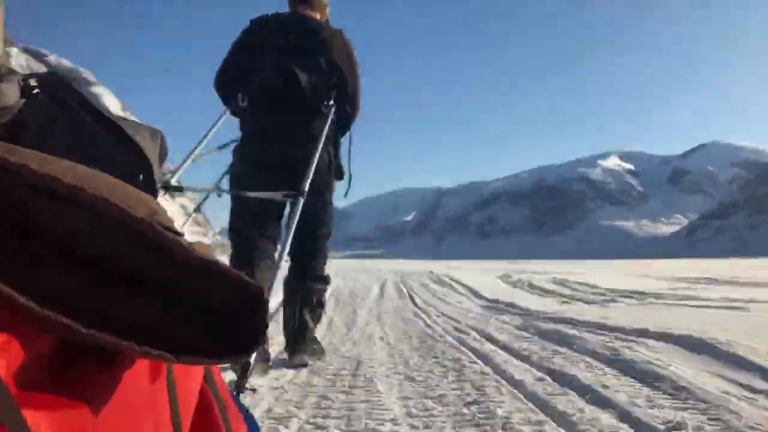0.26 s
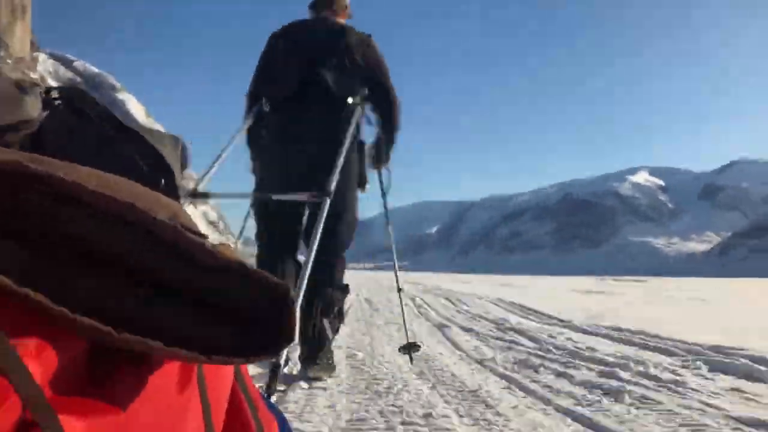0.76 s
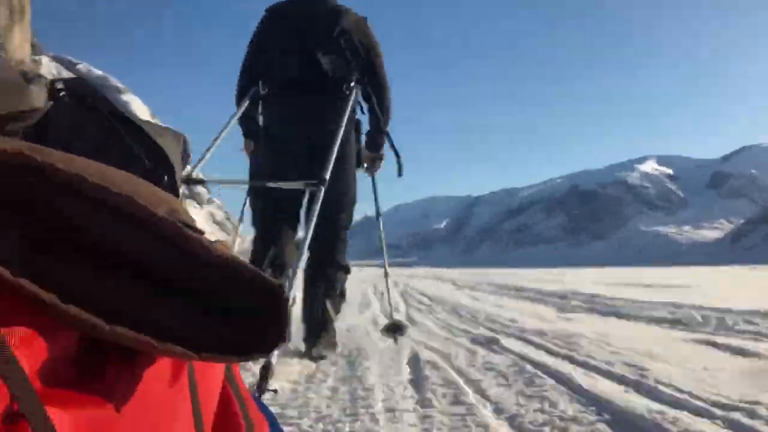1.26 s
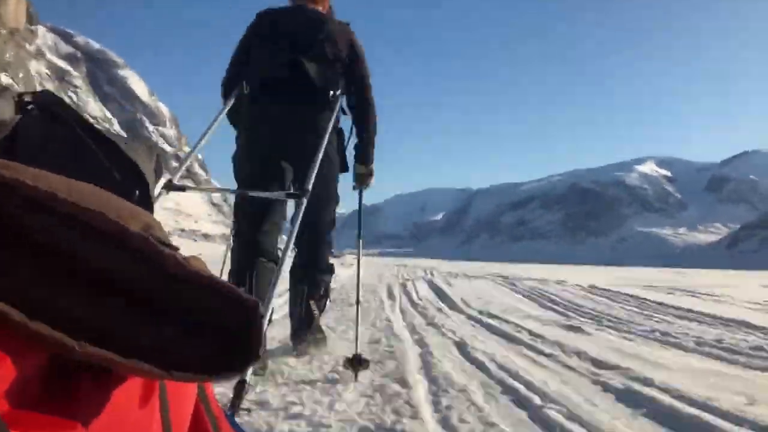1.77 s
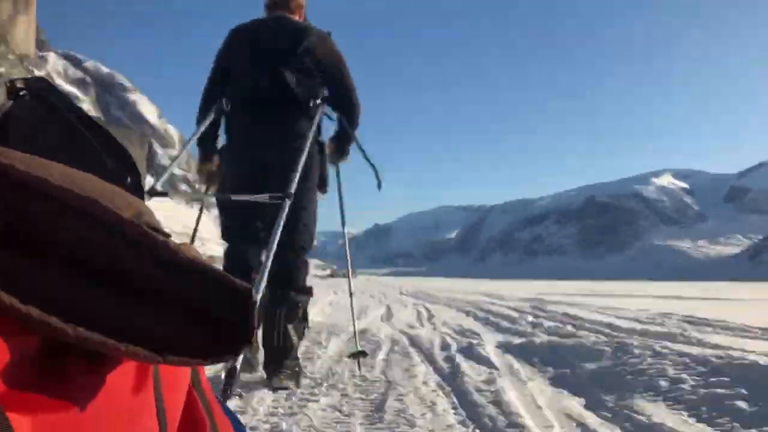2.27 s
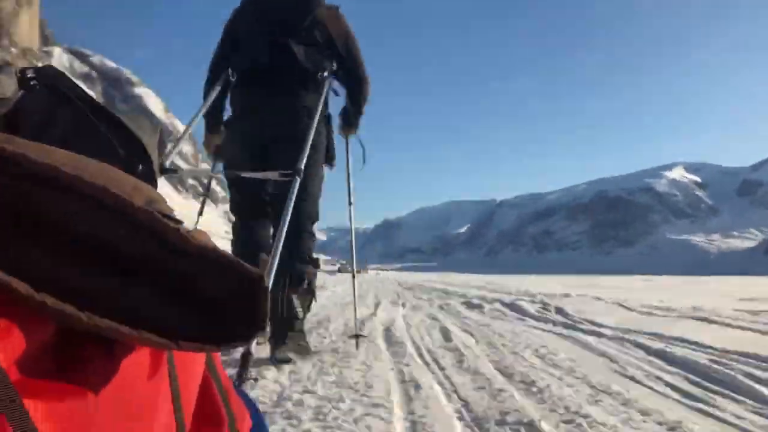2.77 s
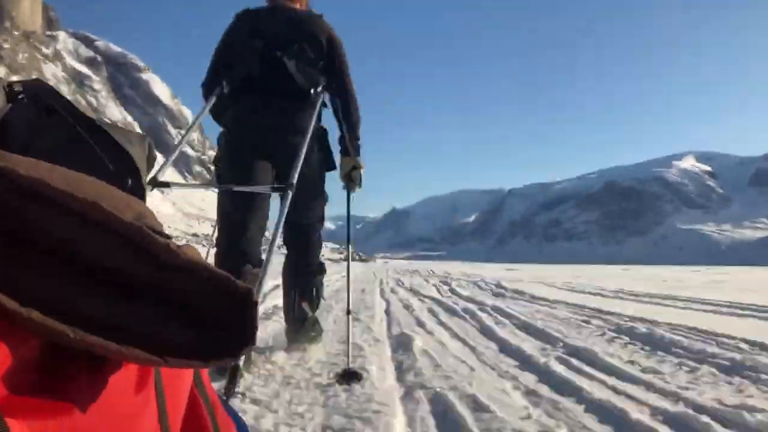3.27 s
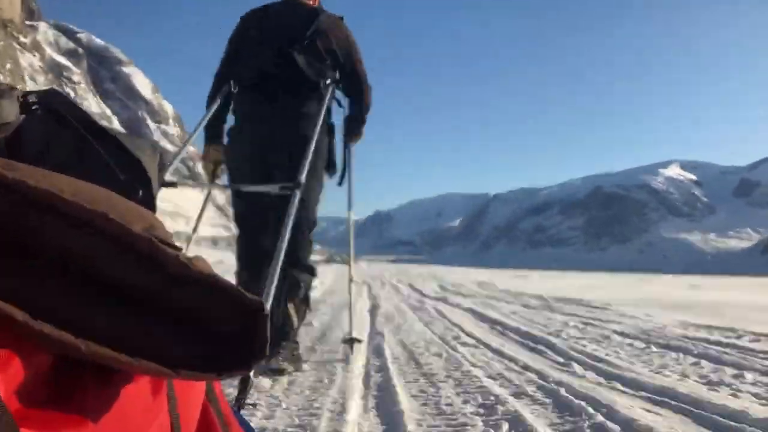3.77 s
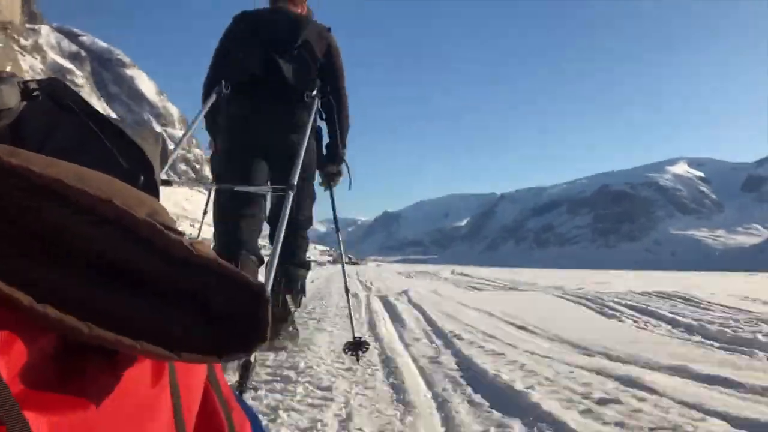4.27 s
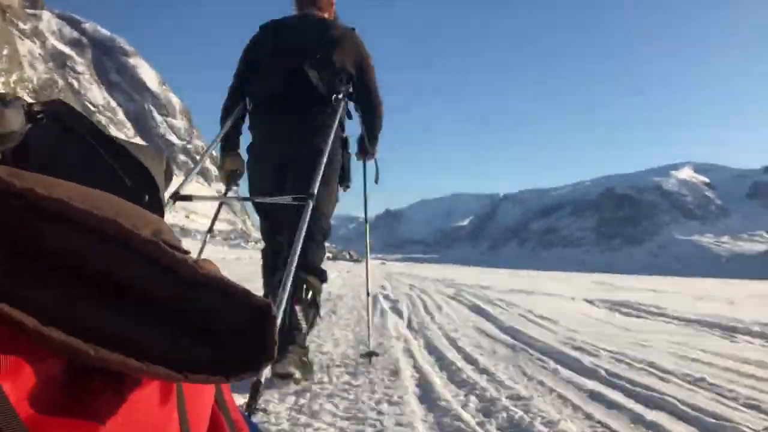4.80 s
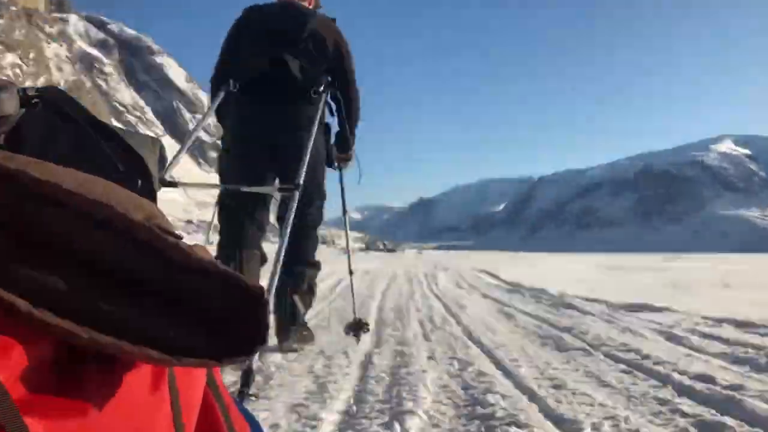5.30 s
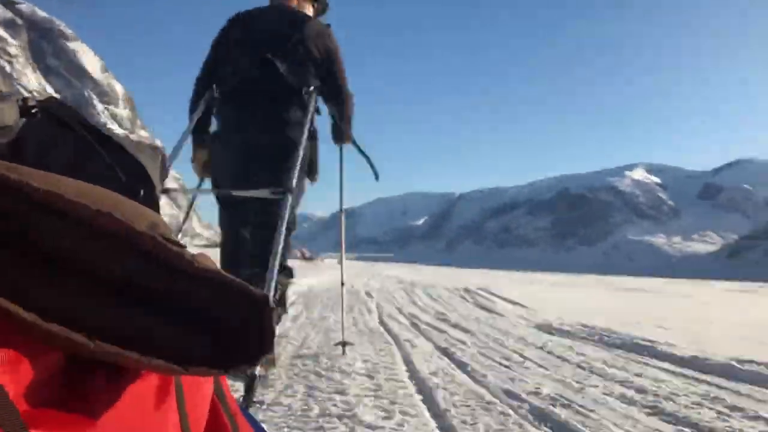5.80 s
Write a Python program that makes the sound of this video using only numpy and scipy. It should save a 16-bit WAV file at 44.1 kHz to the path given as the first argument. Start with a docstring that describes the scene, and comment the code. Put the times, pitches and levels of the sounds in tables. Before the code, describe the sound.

Outdoors on open snow, with no echo, a microphone on a loaded sled hears it being hauled. Throughout, the load booms very low in uneven jolts, leaning to the left-lower, right-stronger side, while runners scrape and hiss with a fast, ridged flutter. Boots crunch and faintly squeak ahead at about 0.4, 1.0, 1.7 and 2.4 s, then on to the end. Small pops burble underneath, with larger ones near 0.1-0.5 and 2.5-2.8 s. Dull knocks cluster around 0.7-1.1, 2.7-3.1 and 4.2-4.4 s, the hardest at 3.9 s beside sharp crust snaps. The drag eases near 2.1 s, and light wind puffs touch one side at 2.2-2.8 s. From 4.4 s a gust swells, buffeting and rushing until about 5.7 s, over a hoarse rasp near 5.3 s. The scrape grows and a big, long boom closes at 6 s.

```python
"""A loaded sled booms as it is hauled over ridged, packed snow, with a two-port microphone on the load.
The load is a low swinging tone; the runners hiss and flutter as filtered grains that follow the drag.
Lumps knock, pop and grind as decaying tones and noise; crust snaps and packed snow crunches.
Boots crunch and squeak through narrow resonances ahead.
Late on, a gust of shaped noise buffets and rushes; a few short puffs catch mostly one port."""
import sys
import numpy as np
from scipy import signal
from scipy.fft import rfft, irfft, next_fast_len
from scipy.io import wavfile

SR = 44100
rng = np.random.default_rng(int(sys.argv[2]) if len(sys.argv) > 2 else 0)


def persist_wave(psi):
    """Save psi, clipped to +-1, as 16-bit WAV."""
    counts = np.round(np.clip(psi, -1, 1) * 32767).astype(np.int16)
    wavfile.write(sys.argv[1], SR, np.atleast_2d(counts).T)


N = 266584
T = np.arange(N) / SR


def gain_of(db):
    """Decibels to gain."""
    return 10 ** (np.asarray(db) / 20)


def evened(x):
    """Scales to an rms of one."""
    return x / np.sqrt(np.mean(x ** 2) + 1e-20)


def in_time(rows):
    """The columns of a curve at every sample."""
    s, *columns = np.transpose(rows)
    return [np.interp(T, s, c) for c in columns]


def in_frequency(rows, hz):
    """The columns of a spectrum at the given frequencies, read along a log axis."""
    f, *columns = np.transpose(rows)
    return [np.interp(np.log(hz + 1), np.log(f + 1), c) for c in columns]


def add(mix, s, sound):
    """Adds a stereo sound into the mix at time s."""
    part = mix[:, max(round(s * SR), 0):][:, :sound.shape[1]]
    part += sound[:, :part.shape[1]]


def panned(sound, left_db):
    """Spreads a sound over the ports with a level difference, keeping their mean."""
    gains = gain_of([[left_db / 2], [-left_db / 2]])
    return sound * gains / gains.mean()


def wander(rate_hz):
    """Smooth chance of unit rms, changing up to about the given rate."""
    step = 32  # samples between drawn points
    size = next_fast_len(N // step + 2)
    hz = np.fft.rfftfreq(size, step / SR)
    slow = irfft(rfft(rng.standard_normal(size)) / (1 + (hz / rate_hz) ** 4), size)
    return np.interp(T, np.arange(size) * step / SR, evened(slow))


def resonate(x, hz, width_hz):
    """A resonance of gain one that follows hz: shift down to zero, smooth, shift back."""
    turn = np.exp(2j * np.pi * np.cumsum(hz * np.ones(x.shape[-1])) / SR)
    r = np.exp(-np.pi * width_hz / SR)
    return 2 * (turn * signal.lfilter([1 - r], [1, -r], x / turn)).real


def grains(per_s, spread_db, share):
    """Countless tiny fractures, plus sparse ones of uneven size that hold a share of the power."""
    size = gain_of(spread_db * np.minimum(rng.exponential(1, N), 4)) * (rng.random(N) < per_s / SR)
    sparse = evened(size * rng.choice([-1, 1], (2, N)))
    return np.sqrt(share) * sparse + np.sqrt(1 - share) * rng.standard_normal((2, N))


def heard(drive, spectrum, ports):
    """Colours two drives and blends them into the two ports; the mean of the ports has unit level."""
    size = next_fast_len(N + 4096)
    hz = np.fft.rfftfreq(size, 1 / SR)
    a, b = rfft(drive, size)
    same, left_db, lead = in_frequency(ports, hz)
    blend = same * a + np.sqrt(1 - same ** 2) * b
    left = blend * gain_of(left_db) * np.exp(1j * lead)
    colour = gain_of(in_frequency(spectrum, hz)[0]) / (1 + gain_of(left_db))
    out = irfft(np.array([left, a]) * colour, size)[:, :N]
    return out / out.mean(0).std()


def bell(t, rise_s, fade_s):
    """A smooth rise and fall around t = 0, each side with its own length."""
    return np.exp(-.5 * (t / np.where(t < 0, rise_s, fade_s)) ** 2)


def swell(s, half_s):
    """A smooth rise and fall around time s."""
    shape = np.zeros(N)
    near = slice(*np.searchsorted(T, [s - 6 * half_s, s + 6 * half_s]))
    shape[near] = bell(T[near] - s, half_s, half_s)
    return shape


def swells(rows):
    """The joint gain of swells given as (s, level dB, half length s)."""
    return np.sqrt(sum((gain_of(db) * swell(s, half)) ** 2 for s, db, half in rows))


# bumps that jolt the load: widest_s, peak_db, half_length_s, pitch_hz
JOLTS = [(0.423, -11.5, 0.037, 37.2), (0.555, -10, 0.015, 48.2), (0.633, -7.5, 0.014, 35.1),
         (0.793, -16.5, 0.026, 47.1), (.961, -10.5, 0.056, 39.5), (1.092, -8, 0.016, 46.9),
         (1.172, -14, 0.019, 53.4), (1.44, -16, 0.017, 36.4), (1.681, -14.5, 0.08, 36),
         (1.877, -7, 0.014, 40.9), (2.001, -17.5, 0.062, 35.8), (2.176, -10.5, 0.032, 38.4),
         (2.314, -9.5, 0.016, 36.4), (2.356, -8.5, 0.02, 35.9), (2.479, -12.5, 0.0096, 48.5),
         (2.881, -18.5, 0.022, 45.1), (2.98, -8, 0.014, 39.1), (3.055, -11.5, 0.012, 38.7),
         (3.128, -12, 0.0084, 45), (3.211, -15, 0.045, 44.5), (3.476, -7.5, 0.018, 40.3),
         (3.572, -14, 0.034, 39.4), (3.622, -10, 0.015, 34.2), (3.707, -11.5, 0.019, 33.6),
         (3.992, -7, 0.012, 42), (4.197, -8.5, 0.029, 37.5), (4.233, -6, 0.013, 43),
         (4.302, -9, 0.014, 39.3), (4.359, -10.5, 0.0092, 43.7), (4.45, -10, 0.04, 36.3),
         (4.784, -10.5, 0.086, 34.7), (5.054, -16, 0.032, 36.7), (5.273, -12, 0.013, 41.6),
         (5.41, -9.5, 0.012, 35.6), (5.458, -15.5, 0.053, 32.1), (5.756, -12, .017, 45.7),
         (5.944, -12.5, 0.014, 32.8), (5.994, -5.5, 0.066, 28.9)]
# colour of the load's rumble: freq_hz, relative_level_db
LOAD = [(8, -21), (20, -13), (28, -17.5), (50, 2.5), (62, -3.5), (80, -16.5), (110, -24.5), (200, -64.5)]
# how the ports hear the hull: freq_hz, likeness (0-1), left_minus_right_db, left_lead_rad
HULL_PORTS = [(60, 1, -11, 0.056), (130, 1, -7, 0.041), (300, 0.89, -9, 0.11), (800, 0.94, -6, 0.51)]
SWAY_HZ, SWAY_DB = 37.4, -23.5  # the load between jolts
RUMBLE_DB = -6.5  # relative to the sway
LOPSIDED = 0.061  # the lashings are stiffer one way, so wide swings gain an octave


def load():
    """The load sways at its low resonance and swings wide at each jolt, over a looser rumble."""
    # the shifting load never swings quite evenly
    clock = np.cumsum(np.exp(0.093 * wander(rate_hz=33.8))) / SR
    swing = gain_of(SWAY_DB + 3 * wander(rate_hz=16)) * np.cos(2 * np.pi * SWAY_HZ * clock)
    power = np.full(N, gain_of(SWAY_DB) ** 2)
    for s, db, half, hz in JOLTS:
        near = abs(T - s) < 5 * half
        reach = gain_of(db) * bell(T[near] - s, half, 1.3 * half)
        swing[near] += reach * np.cos(2 * np.pi * hz * (clock[near] - np.interp(s, T, clock)))
        power[near] += reach ** 2
    octave = LOPSIDED * (2 * swing ** 2 - power)
    level = np.sqrt(power / 2)
    rumble = heard(rng.standard_normal((2, N)), LOAD, HULL_PORTS) * gain_of(RUMBLE_DB) * level
    return swing / level, panned(swing + octave, left_db=-6.5) + rumble


# colour of the scraping runners: freq_hz, relative_level_db
SCRAPE = [(300, -18), (600, -8), (900, -3.5), (1080, -2.5), (1300, -0.5), (1500, -4.5), (1800, -5),
          (2100, -7), (2450, -8), (2850, -14.5), (4500, -16.5), (9000, -46.5)]
# how the ports hear the snow: freq_hz, likeness (0-1), left_minus_right_db, left_lead_rad
SNOW_PORTS = [(583, 0.3, 7, 0.96), (830, 0.83, -4.5, -0.39), (970, 0.83, 3, 0.99), (1630, 0.93, 1, -0.55),
              (2440, 0.51, -1.5, 0.0078), (4070, 1, -3, -0.52), (6500, 0.86, -1, 1), (7600, 0.6, -1, 0.21)]


def hull_ring(hz, width_hz):
    """Scraping grains ring one resonance of the hull."""
    rubbing = grains(per_s=500, spread_db=-1.0, share=0.48) * gain_of(2.2 * wander(rate_hz=14))
    ring = resonate(resonate(rubbing, hz, width_hz), hz, width_hz)
    return heard(ring, SCRAPE, SNOW_PORTS)


# how hard the runners bear on the snow, before the tugs: time_s, drag_db
DRAG = [(0, -1.3), (.2, 0.14), (.62, 0.5), (.9, 0), (1.28, -1), (1.55, 0.2), (1.77, 0.4), (2.06, -3.5),
        (2.21, -3), (2.31, 0), (2.8, -0.5), (3.28, -1.5), (3.55, .5), (4.4, 0.68), (5.3, -2.5),
        (5.62, -0.4), (5.86, -0.1), (6.03, 4)]
# rasps of hard crust that ring the hull: peak_s, hoarse_upper_ring_db, hollow_lower_ring_db, half_length_s
RASPS = [(0.162, -45, -52, 0.033), (0.435, -45.5, -56, 0.033), (0.62, -50, -46, 0.016),
         (1.012, -42.5, -42, 0.021), (1.732, -44.5, -48, 0.16), (3.607, -46, -52, 0.055),
         (3.797, -69, -50, 0.03), (4.186, -42.5, -41, 0.032), (5.314, -40.5, -45.5, 0.21),
         (5.525, -39.5, -62, 0.028), (5.74, -63, -47, 0.029)]
# patches of lumpy snow that grind under the hull: peak_s, level_db, half_length_s
CLODS = [(.18, -37.5, 0.072), (.48, -36, 0.11), (.84, -46, 0.072), (1.11, -36.5, 0.071),
         (1.54, -39.5, 0.19), (1.76, -31.5, 0.026), (1.91, -34.5, 0.062), (2.28, -38.5, 0.18),
         (2.79, -37.5, 0.037), (3.01, -35, 0.057), (3.92, -38, 0.029), (4.11, -35.5, 0.018),
         (5.49, -31.5, 0.034)]
# colour of the hissing runners: freq_hz, relative_level_db
HISS = [(1200, -5.5), (2300, -2), (2900, -3), (3500, -1), (4600, -5), (5900, -1), (6500, -3), (7000, -8),
        (8200, -10), (9600, -15.5)]
# colour of the grinding lumps: freq_hz, relative_level_db
GRIND = [(40, -18), (95, 4.5), (150, -1), (230, -2.5), (400, -7.5), (600, -12.5), (850, -14), (1200, -35.5),
         (3000, -55)]
SCRAPE_DB, HISS_DB, GRIND_DB = -44.5, -45, -40  # at a drag of 0 dB
SCRAPE_FOLLOWS, HISS_FOLLOWS, GRIND_FOLLOWS = 1, 2.27, 1  # dB per dB of drag
HOARSE_DB, HOLLOW_DB = -5.5, -11.5  # the hull's two rings, relative to the scrape
TUG_LEAD_S, TUG_HALF_S = 0.027, 0.055  # the harness pulls just before each boot takes the weight
RIDGES_PER_S, FLUTTER_DB = 18, 0.58
SKIM_FLUTTER, SKIM_BELOW_DB = 0.54, 0  # flutter gained per dB of drag below the skimming point


def runners(sway):
    """Snow crystals break under the runners as the drag and tugs vary; running light, they flutter more."""
    tugs_db = sum(tug_db * swell(s - TUG_LEAD_S, TUG_HALF_S) for s, *_, tug_db in STEPS)
    drag_db = in_time(DRAG)[0] + tugs_db
    flutter_db = FLUTTER_DB + SKIM_FLUTTER * np.maximum(SKIM_BELOW_DB - drag_db, 0)
    turns = np.cumsum(RIDGES_PER_S * (1 + 0.12 * wander(rate_hz=9.4))) / SR
    crest = evened(np.cos(2 * np.pi * turns) + 0.21 * np.cos(4 * np.pi * turns))
    height = 1 + 1.08 * wander(rate_hz=28)  # no two ridges are alike
    pressure_db = flutter_db * crest * height + .5 * wander(rate_hz=19.0) + 0.077 * sway

    coarse = grains(per_s=420, spread_db=2.2, share=.4)
    rubbing = coarse * gain_of(0.5 * pressure_db + 1.6 * wander(rate_hz=23))
    scraping = gain_of(SCRAPE_DB + SCRAPE_FOLLOWS * drag_db)
    hoarse = np.hypot(scraping * gain_of(HOARSE_DB), swells((s, db, half) for s, db, _, half in RASPS))
    hollow = np.hypot(scraping * gain_of(HOLLOW_DB), swells((s, db, half) for s, _, db, half in RASPS))
    scrape = heard(rubbing, SCRAPE, SNOW_PORTS) * scraping
    scrape += hull_ring(hz=1668, width_hz=460) * hoarse
    scrape += hull_ring(hz=846, width_hz=320) * hollow

    fine = grains(per_s=700, spread_db=2.2, share=.3)
    hiss = heard(fine * gain_of(pressure_db), HISS, SNOW_PORTS)
    hissing = gain_of(HISS_DB + HISS_FOLLOWS * drag_db)

    lumps = grains(per_s=260, spread_db=1.5, share=.5)
    grind = heard(lumps * gain_of(.5 * pressure_db + 1.0 * wander(rate_hz=47)), GRIND, HULL_PORTS)
    grinding = np.hypot(gain_of(GRIND_DB + GRIND_FOLLOWS * drag_db), swells(CLODS))
    return scrape + hiss * hissing + grind * grinding


# lumps that strike the hull: start_s, peak_db, pitch_hz
KNOCKS = [(0.704, -21.5, 180), (0.853, -23.5, 200), (1.065, -18, 186), (1.136, -22.5, 230),
          (1.848, -23, 140), (2.119, -21.5, 170), (2.452, -28, 198), (2.681, -20, 169), (2.765, -24.5, 190),
          (2.955, -27, 140), (3.036, -21, 297), (3.103, -25.5, 228), (3.652, -21, 254), (3.904, -14.5, 130),
          (4.192, -21, 247), (4.212, -19.5, 267), (4.278, -20.5, 242), (4.448, -23, 166)]
KNOCK_DROP, KNOCK_DROP_S = 0.95, 0.00078  # a knock starts this share above its pitch and sinks


def knocks():
    """A lump gives the loaded hull one dead blow, a sinking thud, and crumbles."""
    out, t = np.zeros((2, N)), np.arange(SR // 10) / SR
    for s, db, hz in KNOCKS:
        turns = np.cumsum(hz * (1 + KNOCK_DROP * np.exp(-t / KNOCK_DROP_S))) / SR
        thud = np.sin(2 * np.pi * turns) * np.exp(-t / 0.0048)
        crumble = resonate(rng.standard_normal(len(t)), 510, width_hz=390)
        crumble = evened(resonate(crumble, 510, width_hz=390))
        blow = thud + 0.36 * crumble * np.exp(-t / 0.0019)
        add(out, s, panned(blow / abs(blow).max() * gain_of(db), left_db=-7.5))
    return out


POP_HALF_S = 0.0025
POP_SINK_S = 0.01205  # the hull carries high notes faster than low ones, so each pop chirps downward


def pop(hz):
    """One lump bursts: a few rough cycles that sink in pitch."""
    t = np.arange(-SR // 100, SR // 100) / SR
    turns = np.cumsum(hz * np.exp(-t / POP_SINK_S)) / SR + rng.random()
    crumbs = evened(resonate(rng.standard_normal(len(t)), hz, hz))
    burst = np.sin(2 * np.pi * turns) + 0.34 * crumbs
    return panned(burst * bell(t, POP_HALF_S, POP_HALF_S), left_db=-6.5)


# large lumps that pop under the runners: loudest_s, tone_peak_db, pitch_hz (at the loudest)
POPS = [(.118, -39, 845), (.204, -33, 783), (.443, -29, 617), (.476, -32.5, 655), (.539, -37, 660),
        (2.458, -25.5, 527), (2.562, -32.5, 690), (2.66, -34, 650), (2.76, -31, 836), (2.807, -35, 780),
        (3.769, -35, 980), (3.831, -33.5, 990), (4.605, -33, 794)]
SMALL_POPS_PER_S = 45  # at random between the large ones
SMALL_POP_DB, SMALL_POP_HZ = -41, 680.6  # base level and pitch, varied for each pop


def pops():
    """Lumps burst under the runners: a few large ones, and many small ones that grow with the drag."""
    out, drag_db = np.zeros((2, N)), in_time(DRAG)[0]
    at = np.flatnonzero(rng.random(N) < SMALL_POPS_PER_S / SR)
    size_db = 2.6 * np.minimum(rng.exponential(1, N), 2)
    octaves = 0.453 * rng.uniform(-1.977, 2, N)
    level_db = SMALL_POP_DB + drag_db + size_db
    small = [(T[i], level_db[i], SMALL_POP_HZ * 2 ** octaves[i]) for i in at]
    for s, db, hz in POPS + small:
        sound = pop(hz)
        add(out, s - sound.shape[1] / 2 / SR, sound * gain_of(db))
    return out


def dull_crunch(crumbs, hz):
    """Breaking snow: one broad, dull band, leaning toward the right port."""
    band = crumbs[0] + 0.25 * crumbs[1] * np.array([[1], [-1]])
    for _ in range(3):
        band = resonate(band, hz, width_hz=540)
    return panned(evened(band), left_db=-6.5)


# snow giving way under the load: loudest_s, level_db, swell_s, fade_s, centre_hz
CRUNCHES = [(1.095, -40.5, 0.019, 0.0059, 480), (1.15, -41, 0.011, .018, 457),
            (1.71, -36.5, 0.016, 0.015, 510), (1.772, -33, 0.02, 0.012, 490),
            (3.01, -42.5, 0.033, 0.023, 448), (3.605, -38, 0.039, 0.021, 640),
            (4.205, -36.5, 0.024, 0.022, 480), (4.375, -35.5, .008, 0.0081, 546),
            (5.715, -38.5, 0.017, 0.017, 615)]


def crunches():
    """Packed snow gives way in a dense, dull crunch that builds and breaks off."""
    out, t = np.zeros((2, N)), np.arange(-SR // 8, SR // 8) / SR
    crumbs = grains(per_s=400, spread_db=2, share=.75)
    for k, (s, db, rise, fade, hz) in enumerate(CRUNCHES):
        body = dull_crunch(crumbs[:, k * len(t):(k + 1) * len(t)], hz)
        add(out, s + t[0], body * bell(t, rise, fade) * gain_of(db))
    return out


# bits of crust that snap or scuff: start_s, peak_db, pitch_hz, decay_s (of the crumbs)
SNAPS = [(1.067, -29, 1900, 0.0075), (1.351, -29, 1500, 0.0041), (1.846, -26, 800, 0.0036),
         (2.043, -36, 5000, 0.008), (2.229, -30.5, 880, 0.0041), (2.295, -26, 1300, 0.0058),
         (3.889, -25.5, 1150, 0.0036), (3.945, -28.5, 2600, 0.0049), (3.974, -25, 6200, 0.0018),
         (5.767, -28, 990, 0.0027)]


def snaps():
    """Crust cracks with one sharp click and a short spray of crumbs."""
    out, t = np.zeros((2, N)), np.arange(SR // 12) / SR
    for s, db, hz, decay in SNAPS:
        spray = rng.standard_normal(len(t)) * np.exp(-t / decay)
        spray[0] = 4  # the click
        width = min(1.24 * hz, 2800)
        crack = resonate(resonate(spray, hz, width), hz, width)
        add(out, s, panned(crack / abs(crack).max() * gain_of(db), left_db=2.0))
    return out


# boots twisting in the snow: loudest_s, level_db, squeak_hz, swell_s, fade_s,
# tug_db (change of drag on the sled; below zero it eases)
STEPS = [(0.357, -44, 4200, 0.061, 0.033, 0), (1.0, -44, 5220, 0.024, 0.1, 0),
         (1.671, -42, 3860, 0.051, 0.04, 1.5), (2.36, -49, 5000, 0.14, 0.046, 2),
         (2.895, -42.5, 4940, 0.053, 0.021, 1), (3.006, -44, 3830, 0.11, 0.03, 1.5),
         (3.6, -50, 4460, 0.15, 0.07, 1.5), (4.19, -43, 4070, 0.11, .022, 0.8),
         (4.789, -47.5, 4170, 0.041, 0.028, 1), (5.411, -48, 4000, 0.032, 0.032, 2.5),
         (5.77, -47, 3850, 0.088, 0.032, -2.5), (6.009, -51, 4500, 0.083, 0.037, -1.5)]


def boots():
    """Each boot packs cold snow: a stuttering, sinking crunch with a faint, wavering pair of squeaks."""
    out, t = np.zeros((2, N)), np.arange(-SR // 3, SR // 4) / SR
    grit = grains(per_s=400, spread_db=2.2, share=.6)
    crunch = grit * gain_of(2.5 * wander(rate_hz=29))
    waver = np.exp(0.0063 * wander(rate_hz=9.5))
    for k, (s, db, hz, rise, fade, _) in enumerate(STEPS):
        own = slice(k * SR // 3, k * SR // 3 + len(t))  # each step takes its own stretch of grit
        drive = crunch[0, own] + 0.091 * crunch[1, own] * np.array([[1], [-1]])
        pitch = hz * np.exp(-1.3 * t)
        body = evened(resonate(resonate(drive, pitch, width_hz=2200), pitch, width_hz=10000))
        pair = [resonate(body, pitch * waver[own] * ratio, width_hz=140) for ratio in (.88, 1.05)]
        step = evened(body + 0.53 * evened(sum(pair)))
        add(out, s + t[0], panned(step * bell(t, rise, fade) * gain_of(db), left_db=-5.0))
    return out


# soles that slip with a short gritty squeak: loudest_s, level_db, pitch_hz
SLIPS = [(.357, -44, 4300), (1.617, -39, 3700), (1.694, -37, 4020), (3.005, -43, 4000)]
SLIP_HALF_S, SLIP_WIDTH_HZ = 0.0055, 890


def slips():
    """A sole lets go for an instant and the snow beneath it squeaks."""
    out, t = np.zeros((2, N)), np.arange(-SR // 20, SR // 20) / SR
    for s, db, hz in SLIPS:
        grit = resonate(rng.standard_normal(len(t)), hz, SLIP_WIDTH_HZ)
        grit = evened(resonate(grit, hz, SLIP_WIDTH_HZ))
        squeak = grit * bell(t, SLIP_HALF_S, SLIP_HALF_S) * gain_of(db)
        add(out, s + t[0], panned(squeak, left_db=-9.5))
    return out


GUST_START_S, GUST_ATTACK_S, GUST_END_S, GUST_RELEASE_S = 4.363, 0.5, 5.6, 0.31


def wind_speed(lag_s):
    """The gust rises, holds and drops, 0 to 1; a lag delays both its start and its end."""
    rising = (T - lag_s - GUST_START_S) / GUST_ATTACK_S
    falling = (GUST_END_S + lag_s - T) / GUST_RELEASE_S
    return np.sin(np.pi / 2 * np.clip(np.minimum(rising, falling), 0, 1)) ** 2


# surges within the gust: peak_s, buffeting_db, half_length_s
SURGES = [(4.72, -30, 0.035), (4.865, -27.5, 0.071), (5.2, -26, 0.1), (5.36, -31, 0.052)]
# short puffs of wind that catch mostly one port: peak_s, gain_db, half_length_s, left_minus_right_db
PUFFS = [(2.206, -41.5, 0.023, -28), (2.288, -40.5, 0.038, -28), (2.774, -40, 0.04, -34),
         (5.26, -39.5, 0.068, 12)]
# colour of the buffeting: freq_hz, relative_level_db
BUFFET = [(20, -19.5), (70, -4), (130, -1), (220, -3.5), (350, -9), (550, -15.5), (900, -25), (1500, -34),
          (4000, -50)]
# colour of the rush of air: freq_hz, relative_level_db
RUSH = [(400, -2.5), (800, -3), (1200, -1), (1750, 1.5), (2100, -4), (2500, -2), (3100, -7.5), (4500, -6),
        (6200, -1), (6900, -8.5), (8500, -8.5), (9700, -12)]
# how the ports hear the wind: freq_hz, likeness (0-1), left_minus_right_db, left_lead_rad
WIND_PORTS = [(100, 0.1, -20, -1.5), (192, 0.12, -14, 1.5), (301, 0.15, -8, 3), (600, 0.18, 0, 0.5),
              (1070, 0.49, 6, 0.3), (2020, 1, 1, -0.6), (4500, 0.93, 0.5, -0.5), (6500, 0.66, 0.5, -0.5),
              (9000, 0.89, -1.5, 0.6)]
BUFFET_DB, RUSH_DB = -27.5, -35  # at full wind speed, without the surges
BUFFET_POWER, BUFFET_LAG_S = 2.6, 0.037  # buffeting grows faster with wind speed than the rush, and trails it


def gust():
    """Eddies hit the ports nearly on their own in the lows, in surges, under a rush of air."""
    eddies = heard(rng.standard_normal((2, N)) * gain_of(2.2 * wander(rate_hz=52)), BUFFET, WIND_PORTS)
    rush = heard(rng.standard_normal((2, N)) * gain_of(.5 * wander(rate_hz=31)), RUSH, WIND_PORTS)
    steady = gain_of(BUFFET_DB) * wind_speed(BUFFET_LAG_S) ** BUFFET_POWER
    buffeting = np.hypot(steady, swells(SURGES))
    rushing = gain_of(RUSH_DB) * wind_speed(0)
    stray = eddies[1, ::-1]  # backwards: like the eddies, but unrelated to them
    puffs = sum(panned(stray * swell(s, half) * gain_of(db), left_db) for s, db, half, left_db in PUFFS)
    return eddies * buffeting + rush * rushing + puffs


def scene():
    """Open snow throws nothing back: all sources arrive dry."""
    sway, boom = load()
    sled = boom + runners(sway)
    feet = boots() + slips()
    snow = crunches() + pops() + knocks() + snaps()
    return sled + feet + snow + gust()


def record(dry):
    """The microphone rounds off the highest peaks; then the treble is cut at the band limit."""
    rounded = dry / (1 + (dry / .93) ** 10) ** (1 / 10)
    band_limit = signal.firwin(511, 9750, window=("kaiser", 9), fs=SR)  # cutoff in Hz
    return signal.oaconvolve(rounded, band_limit[None], "same")


dry = scene()
out = record(dry)
persist_wave(out)
```